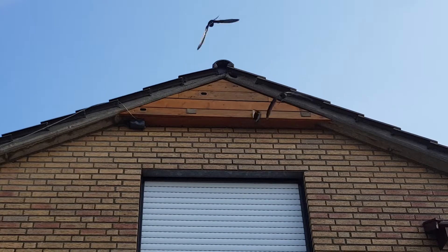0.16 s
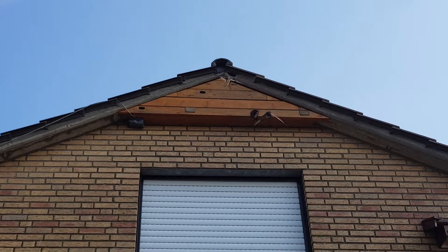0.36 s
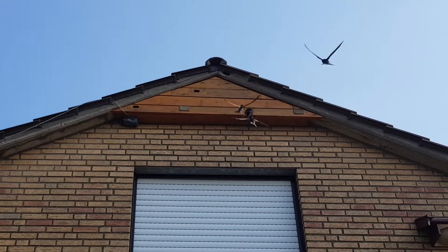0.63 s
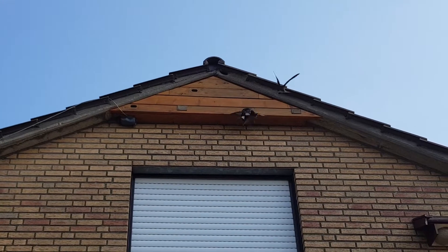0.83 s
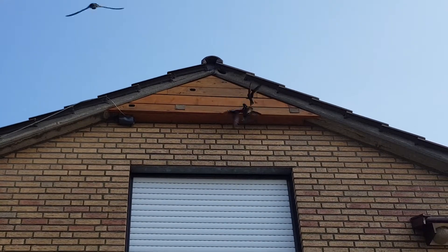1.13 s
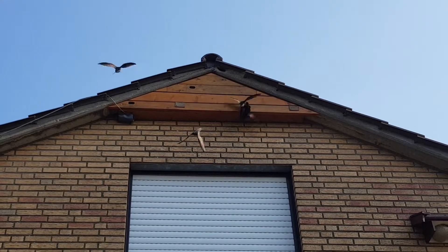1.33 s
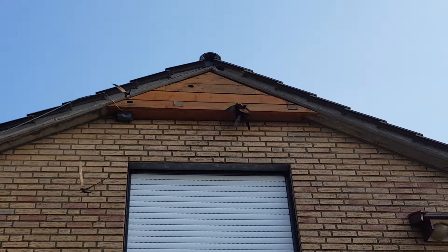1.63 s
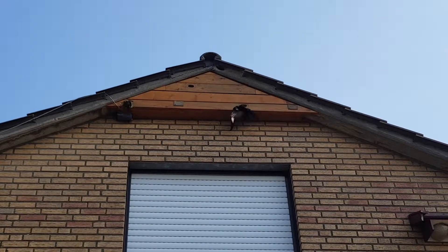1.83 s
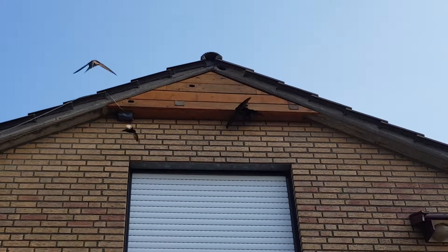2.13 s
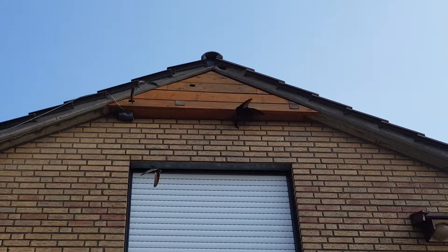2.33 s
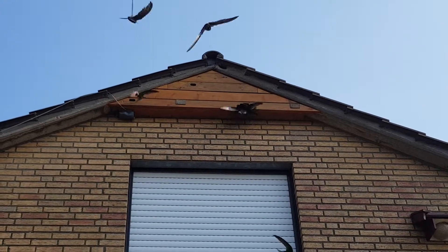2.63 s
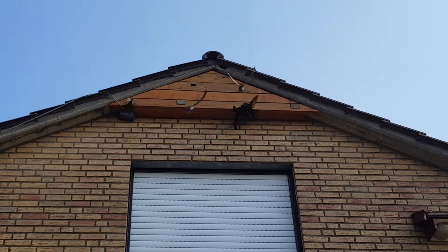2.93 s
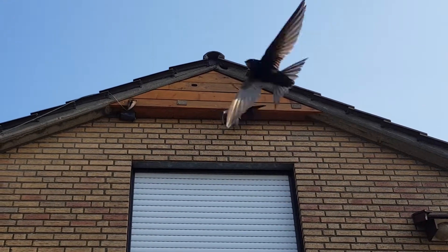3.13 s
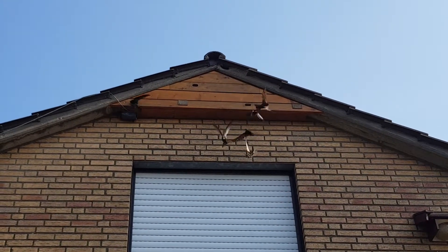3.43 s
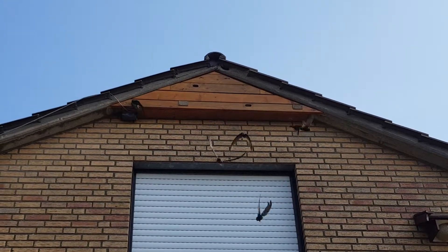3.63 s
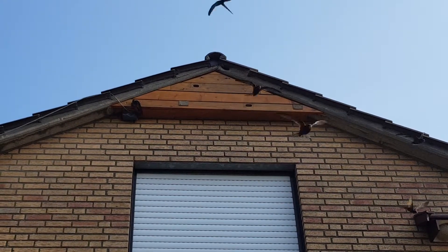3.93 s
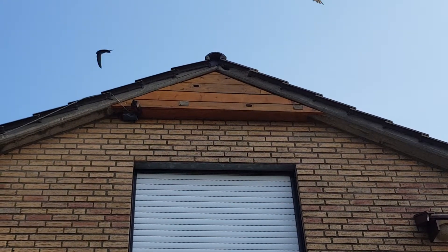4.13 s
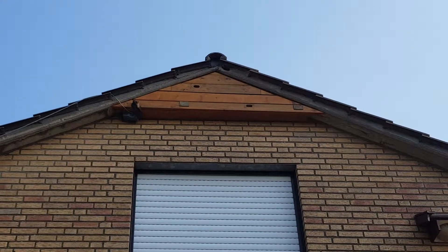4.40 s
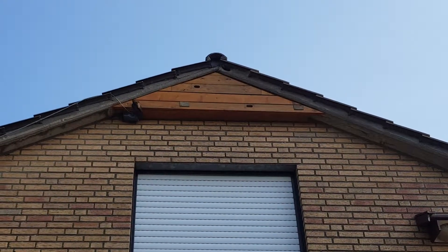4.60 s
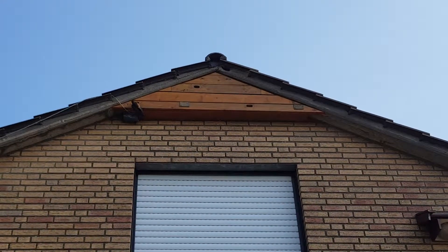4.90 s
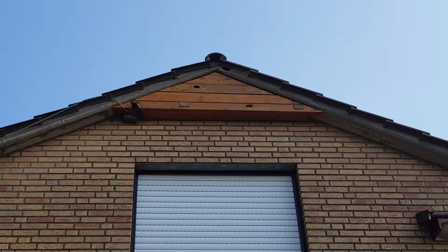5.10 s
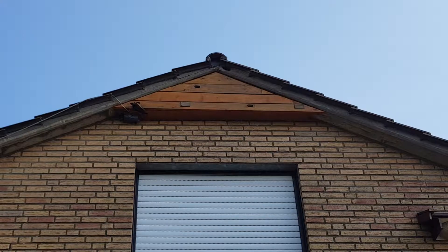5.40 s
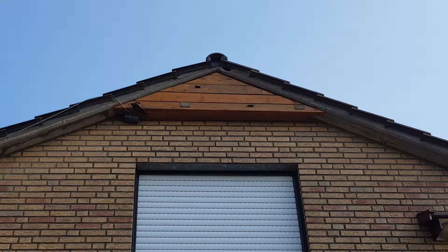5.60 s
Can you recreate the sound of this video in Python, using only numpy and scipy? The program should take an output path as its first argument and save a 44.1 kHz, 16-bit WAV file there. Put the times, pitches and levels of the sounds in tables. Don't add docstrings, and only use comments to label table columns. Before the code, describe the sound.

A group of swifts passes a gable: high, thin, rising screams turn rough and fluttering, some breaking into rapid pulses. Feathery wing slaps on boards accompany them. Before, between and after, a mellow dove coos and faint garden birds whistle. The stereo outdoor pickup has a low town rumble, slight reflections, and a calm ending.

```python
import sys
import numpy as np
from scipy import signal
from scipy.fft import rfft, irfft
from scipy.io import wavfile
from scipy.ndimage import uniform_filter1d

SR = 44100
rng = np.random.default_rng(int(sys.argv[2]) if len(sys.argv) > 2 else 0)


def to_wav(s):
    ch = np.atleast_2d(s).T
    pcm = np.round(np.clip(ch, -1, 1) * 32767)
    wavfile.write(sys.argv[1], SR, pcm.astype(np.int16))


def volts_from_decibels(level):
    exponent = np.asarray(level, float) / 20
    return 10 ** exponent


N = 253575
SIDES = np.array([[0.5], [-0.5]])
PORT_LEAD_RAD = 1.1 * SIDES


def evened(x):
    return x / np.sqrt(np.mean(x ** 2) + 1e-20)


def read(points, hz):
    f, value = np.transpose(points)
    return np.interp(np.log(hz + 1), np.log(f + 1), value)


def curves(rows):
    s, *columns = np.transpose(rows)
    t = np.arange(s[0], s[-1], 1 / SR)
    return [s[0]] + [np.interp(t, s, c) for c in columns]


def add(mix, s, sound, pan_db=0.):
    part = mix[:, round(s * SR):][:, :sound.shape[-1]]
    part += (sound * volts_from_decibels(SIDES * pan_db))[:, :part.shape[1]]


def wander(size, hz):
    lowpass = signal.butter(4, hz, fs=SR, output="sos")
    return evened(signal.sosfilt(lowpass, rng.standard_normal(size + 2000))[2000:])


def fade(size, rise=0.00067):
    t = np.arange(size) / SR
    return np.clip(np.minimum(t, t[::-1]) / rise, 0, 1)


def scream(mix, rows, voice, place, shake, ending):
    # hz, level_db
    throat = [(1500, -27), (4500, -5), (6700, -15.5), (8100, 4), (9700, -16.5), (11400, -2.5),
              (13300, -17.5), (16000, -29.5)]
    # hz, level_db
    beak = [(9000, -13.5), (10300, -14.5), (11300, -3), (12200, -9.5), (13300, -15), (14300, -15.5)]
    first_depth, jitter, swing, rasp = 0.12, 0.05, 0.052, 0.061
    flicker, wobble, waver_db = 0.3, 0.003, 2.2
    s, hz, db = curves(rows)
    hz = uniform_filter1d(hz, size=300, mode="nearest")
    n = len(hz)
    first_db, third_db, fourth_db, fifth_db, haze_db = voice
    pan0_db, pan1_db, high_pan_db = place
    first_hz, last_hz, last_depth, lateness, rough = shake
    trill_s, trill_hz, sweep_growth, floor = ending

    since = s + np.arange(n) / SR - trill_s
    trilling = np.clip(1 + since * trill_hz, 0, 1)
    depth = first_depth + (last_depth - first_depth) * np.linspace(0, 1, n) ** lateness
    depth = np.clip(np.maximum(depth, trilling), 0, 1)
    rate = np.linspace(first_hz, last_hz, n) * (1 + jitter * rough * wander(n, 25))
    flutter = 2 * np.pi * np.cumsum(rate) / SR
    grip = np.clip(depth * (1 + flicker * wander(n, 35)), 0, 1)

    offset = ((since * trill_hz + .5) % 1 - .5) / trill_hz
    pulses = np.exp(-(offset / .0021) ** 2) + 0.34 * np.exp(-((offset - .0035) / 0.0038) ** 2) + floor
    gate = (1 - trilling) * (1 + grip * np.cos(flutter)) + trilling * 2 * pulses
    gate = gate / np.sqrt(uniform_filter1d(gate ** 2, 800)) * fade(n, 0.0032)

    bend = 1 + swing * grip * np.sin(flutter + 0.46) * (1 - trilling)
    bend += rasp * rough * depth ** 2 * (1 - 0.41 * trilling) * wander(n, 720)
    bend += wobble * wander(n, 45.33)
    pulse_drop_per_s = 17 * (1 + sweep_growth * since)
    bend -= pulse_drop_per_s * offset * trilling * np.exp(-(offset / 0.0034) ** 2)
    phase = np.pi * np.cumsum(hz * bend) / SR

    levels = (first_db - 18 * depth + 1.5 * wander(n, 23),
              0,
              third_db - 10 * depth + read(throat, 3 * hz / 2),
              fourth_db + read(beak, 2 * hz),
              fifth_db - 4 * depth,
              -24 - 14 * depth)
    for k, level_db in enumerate(levels, 1):
        pan_db = np.linspace(pan0_db, pan1_db, n) if k < 3 else high_pan_db
        pan_db = pan_db + 2 * wander(n, 27)
        lead = SIDES * (0.6 * wander(n, 15.4) - .5 * (k > 2))
        if k == 1:
            unrest = 0.11 + 3 * depth ** 2
        else:
            unrest = 0.19 * k * depth * rough + .9 * depth * (k == 3) + 0.33 * (k > 2)
        blur = unrest * (1 - 0.78 * trilling) * wander(n, 240)
        tone = np.sqrt(2) * np.cos(k * phase + lead + blur) * (k * hz < 31000)
        blink = 2 if k == 3 else 0.61 * (k > 3)
        tone = tone * (1 + blink * depth * np.cos(flutter))
        add(mix, s, volts_from_decibels(db + level_db + waver_db * wander(n, 63)) * gate * tone, pan_db)

    colour = volts_from_decibels(read(throat, np.fft.rfftfreq(n, 1 / SR)))
    air = evened(irfft(rfft(rng.standard_normal((2, n))) * colour, n))
    swell = depth ** 1.91 * (1 + gate) * (1 - 0.61 * trilling) * fade(n, 0.0085)
    add(mix, s, volts_from_decibels(db + haze_db) * swell * air / 2)


def swifts(mix):
    # start_s, pitch_hz of the strong 2nd harmonic, effort level_db
    arriving = [
        [(1.012, 5750, -45), (1.025, 5730, -29), (1.055, 5950, -25), (1.105, 6050, -27), (1.125, 6150, -33),
         (1.2, 6373, -34.5), (1.43, 6970, -38.5), (1.48, 7600, -45.5), (1.5, 7450, -63)],
        [(1.684, 5430, -33), (1.72, 5940, -26), (1.755, 6060, -26), (1.785, 6400, -28.5), (1.815, 6420, -26),
         (1.84, 6670, -24.5), (1.95, 6610, -33), (1.975, 6850, -30.5), (2.04, 6820, -39)],
        [(2.035, 6820, -34), (2.07, 6600, -43.5), (2.11, 6200, -35.5), (2.15, 6300, -42), (2.175, 6400, -50),
         (2.2, 6350, -37.5), (2.235, 6230, -34.5), (2.255, 6200, -55)],
        [(2.262, 6800, -52), (2.28, 6510, -38), (2.31, 6400, -37), (2.36, 6100, -50.5)],
        [(2.213, 4150, -51), (2.24, 4650, -33), (2.29, 4950, -35), (2.33, 5150, -27.5), (2.37, 5170, -25),
         (2.42, 5190, -30), (2.5, 5130, -30), (2.58, 5230, -33.5), (2.625, 4950, -48)],
    ]
    # start_s, pitch_hz, level_db
    circling = [
        [(2.45, 5400, -43), (2.48, 5550, -27), (2.52, 5640, -32), (2.55, 5920, -37.5), (2.62, 5960, -34.5),
         (2.66, 6020, -34), (2.7, 5870, -38.5), (2.83, 5900, -45)],
        [(2.645, 5300, -42.5), (2.68, 5720, -37.5), (2.71, 5900, -30.5), (2.74, 6150, -31), (2.8, 6130, -31.5),
         (2.83, 6090, -35.5), (2.9, 6000, -40), (2.965, 5950, -44), (3.005, 5900, -38)],
        [(3.025, 4600, -42.5), (3.05, 5100, -26), (3.075, 5600, -29.5), (3.15, 5750, -29.5), (3.2, 5780, -31),
         (3.3, 5680, -36.5), (3.355, 5550, -42), (3.385, 5560, -35), (3.45, 5150, -40)],
    ]
    # start_s, pitch_hz, level_db
    close_pass = [
        [(3.44, 5250, -49), (3.485, 5720, -35.5), (3.5, 6000, -21), (3.6, 6645, -21.5), (3.7, 6910, -26.5),
         (3.78, 7320, -29.5), (3.95, 7040, -39), (3.985, 6720, -36.5), (4.06, 5850, -32)],
        [(3.48, 4760, -37), (3.495, 5195, -29.5), (3.522, 5906, -25), (3.6, 6170, -20.5), (3.64, 6190, -24),
         (3.81, 6410, -30), (3.84, 6120, -30.5), (3.88, 6180, -29.5), (4.02, 5750, -38)],
        [(3.738, 4210, -43.5), (3.755, 5070, -30.5), (3.775, 5394, -28), (3.8, 5510, -32), (3.85, 5550, -34),
         (3.92, 5435, -36), (4.03, 5400, -39.5)],
    ]
    # start_s, pitch_hz, level_db
    leaving = [
        [(4.037, 5050, -27.5), (4.055, 5250, -26), (4.078, 5680, -24), (4.12, 5760, -25.5), (4.16, 5870, -20.5),
         (4.2, 5790, -22), (4.24, 5860, -21.5), (4.29, 5930, -24), (4.33, 5880, -27.5)],
        [(4.325, 5880, -23.5), (4.44, 5790, -24.5), (4.47, 5930, -22), (4.5, 5850, -27), (4.62, 5900, -29.5),
         (4.72, 5900, -37.5), (4.895, 5750, -47.5), (4.95, 5600, -39.5), (5.025, 4743, -50.5)],
        [(4.312, 5550, -39.5), (4.332, 6120, -24.5), (4.355, 6520, -18), (4.38, 6620, -19.5),
         (4.42, 6880, -23.5), (4.5, 7050, -26), (4.555, 7200, -29), (4.575, 6900, -29), (4.655, 5900, -32)],
    ]
    # level_db re 2nd harmonic of harmonics 1, 3, 4, 5 and of the breath
    voices = [(-27, -7.5, -3, -26.5, 0.5), (-35, -14, -11.5, -42, -8.5), (-33, -15, -13.5, -44.5, -0.5),
              (-43, -29, -3, -47, -8.5), (-31.5, -18, -1, -33, 1), (-25.5, -8.5, -0.5, -24, -2),
              (-52, -20, -10, -36.5, -5), (-28.5, -14, 0, -23.5, 0), (-42, -20.5, -5, -67.5, 1.5),
              (-39.5, -36.5, -5, -50, -16), (-16.5, -9, 5.5, -26, -14.5), (-36.5, -13, 1.5, -27.5, -8.5),
              (-47, -30.5, -3, -33.5, -8.5), (-38.5, -13.5, -5, -52, -26)]
    # left-right start_db, end_db, high_harmonics_db
    places = [(12, -10.5, 6.5), (11, -6, 3), (-0.5, 9.5, 7), (-0.5, 19, 0), (11.5, 9.5, 7.5),
              (8, 17.5, 3.5), (6, 9.5, 4.5), (7.5, 9.5, 3), (8.5, -0.5, 5), (6.5, 17, 1.5), (6.5, 8.5, 6),
              (8.4, 5.5, -5.5), (-4, 2, -4), (-2.5, 4, 1)]
    # first_hz, last_hz, final depth (0-1), lateness of growth, rasp (0-1)
    flutters = [(232, 220, 0.68, 0.9, 0.89), (330, 200, 0.44, 1.3, 0.24), (300.8, 650, 0.69, 0.18, .9),
                (490, 490, .9, 1.1, 0.55), (293, 250, 0.8, 1.7, 0.6), (320, 290, 0.84, 0.79, 1),
                (302, 410, 0.7, 0.38, 0), (320, 190, 0.65, 0.55, 0.7), (309, 220, 1, 2.6, 1),
                (290, 200, 0.6, 2.2, 1), (284, 140, .6, 0.53, 0.3), (307.5, 280, 0.43, 0.63, 0.3),
                (283, 310, 0.67, 0.31, 0.9), (291, 270, 1, 1.6, 0.86)]
    # start_s (late means none), rate_hz, sweep growth per s, level between pulses (0-1)
    endings = [(9, 150, 0, 0), (9, 80, 0, 0), (9, 80, 0, 0), (2.273, 78, 0, .1), (2.562, 80, 0, .3),
               (9, 80, 0, 0), (9, 80, 0, 0), (3.377, 72, 0, .3), (3.988, 83, 0, .08), (9, 80, 0, 0),
               (3.962, 76, 0, .3), (9, 80, 0, 0), (4.912, 75.5, 20, .18), (4.574, 80, 0, .15)]
    calls = np.zeros((2, N))
    for call in zip(arriving + circling + close_pass + leaving, voices, places, flutters, endings):
        scream(calls, *call)
    mix += calls
    add(mix, 0.041, volts_from_decibels(-13) * calls[::-1])


def wings(mix):
    # start_s, peak level_db, colour_hz
    slaps = [(0.088, -46, 122), (0.091, -54, 1500), (0.111, -50, 6000), (0.139, -47.5, 5100),
             (0.845, -53.5, 1650), (1.322, -62, 1210), (1.393, -39.5, 1540), (1.84, -44.5, 192),
             (1.991, -41.5, 2660), (2.56, -37.5, 565), (2.59, -41, 810), (2.863, -45, 197),
             (2.491, -51, 500), (1.73, -53, 404), (1.36, -56, 250), (3.226, -40, 1940), (3.243, -38, 1476),
             (3.289, -38, 1420), (3.336, -44, 1190), (3.375, -36.5, 1580), (3.41, -41, 954)]
    t = np.arange(4000) / SR
    for s, db, hz in slaps:
        puff = rng.standard_normal(len(t)) * np.exp(-t / 0.015) * np.minimum(t / 0.002, 1)
        body = signal.lfilter(*signal.butter(2, [hz / 4.8, hz * 2.36], "band", fs=SR), puff)
        add(mix, s, volts_from_decibels(db) * body / abs(body).max(), -1.5 + 4.0 * rng.standard_normal())


def dove(mix):
    # start_s, pitch_hz, level_db
    coos = [
        [(.025, 507, -58), (.05, 520, -51.5), (.1, 579, -44.5), (.17, 559, -44), (.19, 506, -53),
         (.33, 481, -61), (.47, 441, -70)],
        [(.825, 454, -92), (.85, 509, -50), (.888, 538, -47), (.94, 484, -57), (1.02, 428, -66)],
        [(1.7, 510, -64), (1.722, 505, -53.5), (1.768, 531, -46.5), (1.785, 593, -49), (1.89, 567, -50),
         (1.96, 555, -67)],
        [(2.055, 490, -62), (2.075, 517, -49), (2.124, 532, -45.5), (2.17, 511.6, -49.5), (2.35, 492, -54.5),
         (2.46, 477, -59), (2.55, 427, -65)],
        [(2.875, 449, -68), (2.91, 518, -50.5), (2.96, 507, -49.5), (3.05, 454, -66)],
    ]
    # start_s, pitch_hz, level_db
    coos_again = [
        [(3.495, 503, -48), (3.518, 512, -56.5), (3.536, 510, -45), (3.552, 596.5, -48), (3.67, 587.4, -49.5),
         (3.73, 558, -52), (3.77, 560, -66)],
        [(3.87, 490, -68), (3.892, 500, -48.5), (3.922, 571, -46), (4.03, 562, -42.5), (4.06, 513, -49),
         (4.24, 487, -61.5), (4.36, 430, -70)],
        [(4.72, 502, -67), (4.75, 510, -49), (4.8, 492, -54), (4.93, 415, -72)],
        [(5.45, 492, -64), (5.472, 503, -54.5), (5.516, 542.6, -46), (5.534, 584, -52.5), (5.644, 566, -47.5),
         (5.7, 559, -64.5)],
    ]
    for rows in coos + coos_again:
        s, hz, db = curves(rows)
        n = len(hz)
        throb = 1 + 0.0037 * wander(n, 30)
        phase = 2 * np.pi * np.cumsum(uniform_filter1d(hz, 300) * throb) / SR
        coo = volts_from_decibels(db - 1.0 + 1.3 * wander(n, 71)) * fade(n, 0.011) * np.cos(phase)
        add(mix, s, coo, 7)
        add(mix, s + 0.18, volts_from_decibels(-16) * coo, -3.0)


def falling_sweeps(mix, rows, rate_hz, share, pan_db, unrest):
    s, hz, db = curves(rows)
    n = len(hz)
    beat = np.cumsum(rate_hz * (1 + unrest * wander(n, 90))) / SR % 1
    sweep = 1 + share * np.cos(np.pi * beat ** 0.99) / 2.4
    phase = 2 * np.pi * np.cumsum(hz * sweep) / SR
    song = evened((0.03 + np.sin(np.pi * beat) ** 0.56) * np.cos(phase - PORT_LEAD_RAD))
    add(mix, s, volts_from_decibels(db + 3.1 * wander(n, 270)) * song, pan_db)


def finch(mix):
    # start_s, centre_hz, level_db
    wheeze = [
        (.64, 4100, -78),
        (0.74, 3930, -57),
        (0.95, 3980, -53),
        (1.3, 3840, -53.5),
        (1.45, 3510, -55),
        (1.65, 2810, -64),
        (1.79, 2800, -68),
    ]
    # start_s, centre_hz, level_db
    trill = [
        (2.849, 3130, -64.5),
        (2.951, 3305, -56.5),
        (3.7, 3260, -57.5),
        (3.781, 3060, -62),
    ]
    falling_sweeps(mix, wheeze, rate_hz=150, share=0.38, pan_db=-3.9, unrest=0.22)
    falling_sweeps(mix, trill, rate_hz=41, share=0.25, pan_db=-1.8, unrest=0.078)


def chirps(mix):
    # start_s, length_s, start_hz, end_hz, level_db
    notes = [(0.064, 0.0048, 3470, 4130, -60), (0.074, 0.057, 4060, 4040, -59),
             (0.08, 0.018, 3770, 4900, -59), (0.111, 0.0043, 3670, 4600, -53),
             (0.115, 0.028, 4100, 4970, -56), (0.134, 0.037, 3570, 5080, -52),
             (0.103, 0.014, 3700, 4700, -60), (0.125, .014, 3700, 4800, -59),
             (0.167, 0.016, 3800, 4900, -62), (1.805, 0.0044, 5920, 5700, -25),
             (3.011, 0.005, 5800, 5700, -28), (3.016, 0.0056, 5900, 5600, -33.5),
             (3.033, 0.019, 5900, 5600, -42.5), (3.693, 0.027, 5750, 5900, -39),
             (3.726, 0.016, 5850, 5900, -37.5), (3.756, 0.018, 5800, 5850, -32)]
    for s, length, hz0, hz1, db in notes:
        phase = 2 * np.pi * np.cumsum(np.linspace(hz0, hz1, round(length * SR))) / SR
        note = np.hanning(len(phase)) * (np.cos(phase) + volts_from_decibels(-10.5) * np.cos(2 * phase))
        add(mix, s, volts_from_decibels(db + 3.5) * note, 11.5 if s > 2.6 else 6)


def far_birds(mix):
    # start_s, length_s, start_hz, end_hz, level_db
    whistles = [(0, 0.17, 2460, 2350, -74), (0, 0.016, 1790, 1620, -55), (0.098, 0.09, 2140, 2730, -73),
                (.61, .03, 4100, 4500, -72), (1.56, 0.3, 1930, 1820, -76), (1.76, 0.06, 3350, 3410, -60),
                (1.926, .17, 3410, 3740, -62), (1.93, 0.19, 2150, 2400, -66), (2.24, 0.5, 1820, 2270, -71),
                (1.14, .16, 7900, 8150, -64), (1.365, .05, 8000, 7900, -60), (2.83, .085, 7000, 6900, -58),
                (4.09, .15, 2750, 2900, -63), (2.105, .045, 1200, 1130, -61), (2.19, .045, 1200, 1130, -57),
                (4.985, .035, 3800, 3450, -66), (4.91, 0.11, 1600, 2240, -76),
                (5.44, 0.13, 1700, 1950, -82), (5.66, 0.09, 1480, 2330, -77)]
    for s, length, hz0, hz1, db in whistles:
        n = round(length * SR)
        hz = np.linspace(hz0, hz1, n) * (1 + 0.058 * wander(n, 250))
        phase = 2 * np.pi * np.cumsum(hz) / SR
        level = volts_from_decibels(db + 10.0 + 5.5 * wander(n, 82))
        add(mix, s, level * fade(n, 0.025) * np.cos(phase + PORT_LEAD_RAD))


def street(x):
    # hz, t60_s
    decay = [(500, 0.54), (3000, 0.33), (6000, 0.56), (12000, 0.27)]
    taps = np.zeros((2, SR))
    slots = np.arange(200, SR - 20, 20)
    at = slots + rng.integers(0, 20, (2, len(slots)))
    np.put_along_axis(taps, at, rng.choice([-1., 1.], at.shape), 1)
    hz, t, z = signal.stft(taps, SR, nperseg=256)
    t60_s = read(decay, hz)[:, None]
    tail = signal.istft(z * volts_from_decibels(-60 * t / t60_s) / np.sqrt(t60_s), SR, nperseg=256)[1]
    return signal.fftconvolve(x.mean(0)[None], tail / np.linalg.norm(tail[0]), axes=1)[:, :N]


def town():
    # hz, level_db per Hz
    hum = [(18, -48), (32, -9), (71, -1.5), (210, -24.5), (540, -24), (721, -30.5), (2700, -35),
           (16000, -39)]
    # hz, coherence (0-1)
    likeness = [(60, 0.94), (400, 0.91), (2400, 0.1), (15000, 0.2)]
    # start_s, level_db
    swell = [(.1, -2.5), (.55, -4), (1.3, -1), (1.6, -3), (2.2, 2.5), (2.75, -2), (3.4, 2.5), (4.6, -2.5),
             (5.2, -7.5), (5.6, -3.5)]
    frames, hz = N // 256 + 5, np.fft.rfftfreq(1024, 1 / SR)
    a, b, c, d, patches = rng.standard_normal((frames, 513, 5)).T
    patches = evened(uniform_filter1d(uniform_filter1d(patches, 14, 0), 20, 1))
    same = np.clip(read(likeness, hz), -1, 1)[:, None]
    left = a + 1j * b
    right = same * left + np.sqrt(1 - same ** 2) * (c + 1j * d)
    background_db = np.interp(np.arange(frames) * 256 / SR, *np.transpose(swell))
    z = np.array([left, right]) * volts_from_decibels(read(hum, hz)[:, None] + 1.5 * patches + background_db)
    return volts_from_decibels(-59.5) * evened(signal.istft(z, nperseg=1024, noverlap=768)[1][:, :N])


def scene():
    near, far = np.zeros((2, 2, N))
    swifts(near)
    wings(near)
    dove(near)
    chirps(near)
    finch(far)
    far_birds(far)
    return near + far + street(volts_from_decibels(-13) * near + volts_from_decibels(-2) * far) + town()


def low_pass(x):
    return signal.sosfilt(signal.butter(12, 15450, fs=SR, output="sos"), x)


def record(dry):
    late = np.array([dry[0], np.roll(dry[1], 1)])
    rumble_filter = signal.butter(2, 22.3, "high", fs=SR, output="sos")
    return low_pass(signal.sosfilt(rumble_filter, late))


dry = scene()
out = record(dry)
to_wav(out)
```